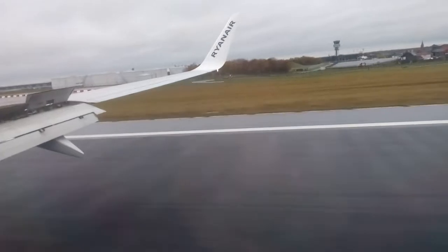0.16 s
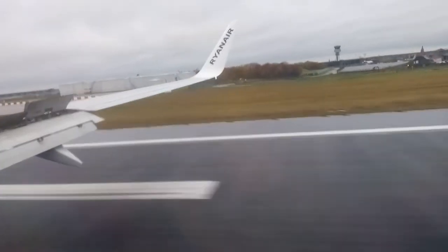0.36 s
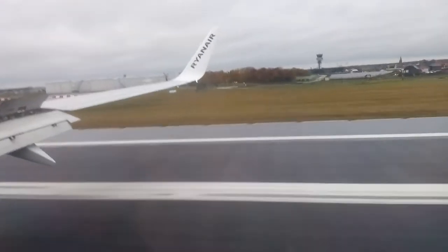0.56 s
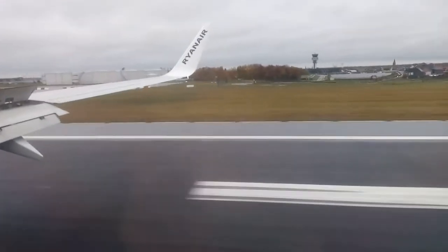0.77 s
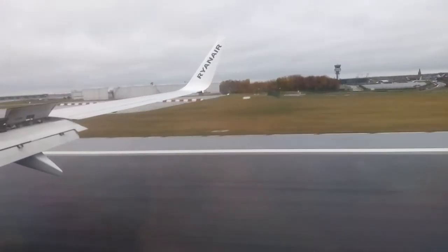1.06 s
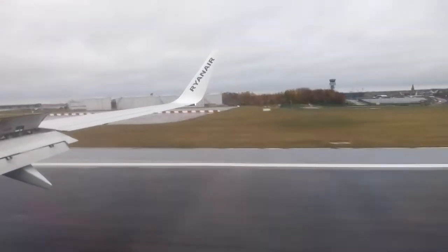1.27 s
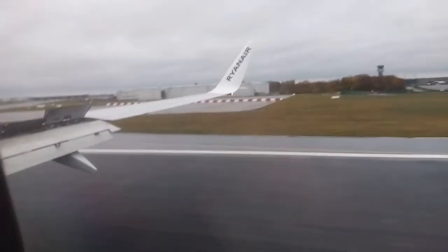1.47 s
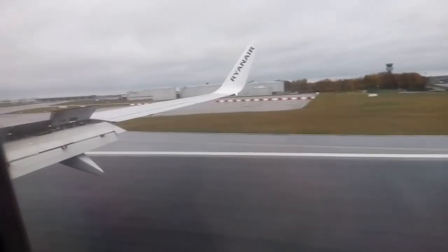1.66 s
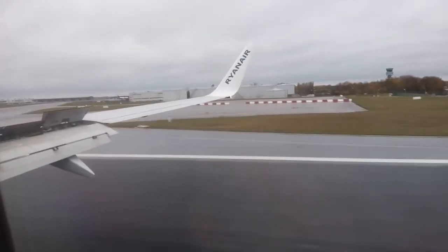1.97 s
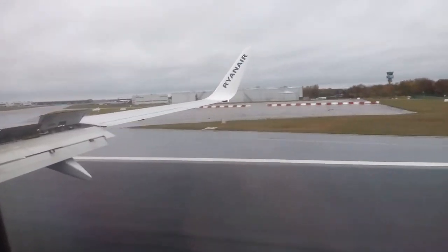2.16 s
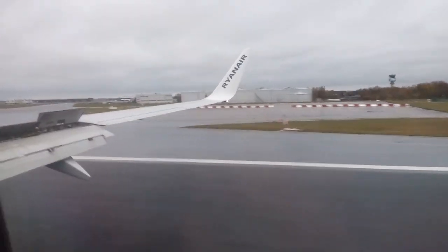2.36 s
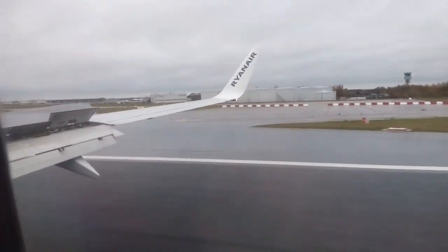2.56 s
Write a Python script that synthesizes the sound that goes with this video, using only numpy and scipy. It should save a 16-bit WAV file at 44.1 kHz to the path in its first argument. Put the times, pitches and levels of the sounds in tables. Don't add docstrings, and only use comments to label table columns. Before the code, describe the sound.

Jet cabin rumble fills the whole take as the plane rolls on wet tarmac, hissing faintly; a burst of rustles, knocks and clinks at the start, sparse ticks later, another rattle near the end, dull close handheld sound.

```python
import sys
import numpy as np
from scipy import signal
from scipy.fft import rfft, irfft
from scipy.io import wavfile
from scipy.ndimage import uniform_filter1d

SR = 44100
rng = np.random.default_rng(int(sys.argv[2]) if len(sys.argv) > 2 else 0)


def to_linear_factor(level_db):
    exponent = np.asarray(level_db, float) / 20
    return 10 ** exponent


def waveform_to_disk(signal):
    frames = np.transpose(np.atleast_2d(signal))
    scaled = np.clip(frames, -1, 1) * 32767
    samples = np.round(scaled).astype(np.int16)
    wavfile.write(sys.argv[1], SR, samples)


N = 119070
T = np.arange(N) / SR


def in_time(rows):
    s, *columns = np.transpose(rows)
    return [np.interp(T, s, column) for column in columns]


def rms_one(x):
    return x / np.sqrt(np.mean(x ** 2) + 1e-20)


def gain_at(points):
    hz, db = np.transpose(points)
    grid_hz = np.maximum(np.arange(N // 2 + 1) * SR / N, 1)
    return to_linear_factor(np.interp(np.log(grid_hz), np.log(hz), db))


def colour(x, points):
    floor = (points[0][0] / 2, -150)
    return rms_one(irfft(rfft(x) * gain_at([floor] + list(points)), N))


def drift(rate_hz):
    lowpass = [(.3, 0), (rate_hz, 0), (4 * rate_hz, -24), (40 * rate_hz, -120)]
    return colour(rng.standard_normal(N), lowpass)


def spread(mid, side):
    return np.array([mid + side, mid - side])


def panned(x, db):
    return x * to_linear_factor(np.array([[db / 2], [-db / 2]]))


def ring(drive, hz, t60):
    radius = to_linear_factor(-60 / (t60 * SR))
    w = 2 * np.pi * hz / SR
    return signal.lfilter([0, np.sin(w)], [1, -2 * radius * np.cos(w), radius * radius], drive + 1e-18)


def click(s, db):
    return to_linear_factor(db) * (np.arange(N) == int(s * SR))


def struck(s, db, hz, t60):
    size = int(7 * SR / hz) + 4
    soft = np.hanning(size)
    touch = soft * np.cos(2 * np.pi * hz / SR * np.arange(size)) * 2 / soft.sum()
    return ring(np.convolve(click(s, db), touch)[:N], hz, t60)


def boom(level_db):
    # f/Hz, density/dB per Hz
    common = [(12, -49), (20, -42.5), (38, -15), (87, -7), (225, 0), (345, -9), (375, -13), (441, -17),
              (1000, -37.5), (1300, -58), (2200, -120)]
    # f/Hz, density/dB per Hz
    difference = [(12, -48), (20, -26.5), (38, -30), (89, -12), (168, -5.5), (298, -7.5), (1000, -17.5),
                  (1300, -49.5), (2200, -120)]
    difference_db = -19
    mid, side = rng.standard_normal((2, N))
    return to_linear_factor(level_db) * spread(colour(mid, common), to_linear_factor(difference_db) * colour(side, difference))


def panels():
    # f/Hz, bandwidth/Hz, common level/dB, difference level/dB, growth/dB per s
    modes = [
        (87.8, 33.5, -26, -45, -4),
        (437.3, 36, -37, -47, -1),
        (231, 64, -20, -42, 0),
        (345.8, 35, -27, -44.5, -.5),
        (802, 27, -55, -51, 2.5),
        (1406, 93, -55.5, -52, 5),
        (2243, 140, -59, -64, 3.5),
        (2060, 130, -55.5, -66, 1),
        (2810, 78, -64.5, -66.5, 4),
        (2500, 90, -65.5, -64.5, 7.5),
    ]
    out = 0
    for hz, width, db, wide_db, growth_db in modes:
        t60 = np.log(1000) / (np.pi * width)
        mid, side = (rms_one(ring(ring(v, hz, t60), hz, t60)) for v in rng.standard_normal((2, N)))
        wander_db = 4.5 if hz > 1000 else 3
        level_db = wander_db * drift(11.0) + growth_db * (T - N / 2 / SR)
        out = out + to_linear_factor(level_db) * spread(to_linear_factor(db) * mid, to_linear_factor(wide_db) * side)
    return out


def air(change_db):
    # f/Hz, density/dB per Hz
    common = [(470, -18), (800, -4), (1010, -9.5), (1410, -10.5), (1770, -15.5), (2210, -15.5), (2990, -22),
              (5960, -30.5)]
    # f/Hz, density/dB per Hz
    difference = [(470, -38.5), (800, -9.5), (1170, -15.5), (1420, -9), (1700, -17.5), (2230, -20.5),
                  (2700, -23), (5910, -33.5)]
    common_db, difference_db = -40, -39.5
    lean = 0.44
    gust_db, gusts_hz = .7, 9.0
    mid, side = rng.standard_normal((2, N))
    side = lean * mid + np.sqrt(1 - lean ** 2) * side
    gust = to_linear_factor(change_db + gust_db * drift(gusts_hz))
    return gust * spread(to_linear_factor(common_db) * colour(mid, common), to_linear_factor(difference_db) * colour(side, difference))


def shuffles():
    # t/s, length/s, level/dB, left-right/dB
    slides = [(0.017, 0.033, -40.5, -2.5), (0.118, 0.064, -31, 2.5), (0.184, 0.075, -41.5, 5.5),
              (0.275, 0.14, -39, 3), (0.370, 0.024, -31, 2), (0.405, 0.053, -51.5, -5),
              (0.424, 0.02, -30.5, 3), (0.437, 0.037, -34.5, 3.5), (0.591, 0.045, -43, 1),
              (0.07, 0.027, -45.5, 4), (0.49, 0.008, -28, 1), (0.505, 0.018, -38, -5),
              (0.695, 0.17, -46, 11), (2.317, 0.037, -46.5, 14.5), (2.328, 0.027, -38.5, 1.5),
              (2.423, .08, -53.5, 2), (2.56, 0.027, -42, 10.5)]
    # f/Hz, density/dB per Hz
    rubbing = [(700, -27), (1200, -12.5), (2000, 0.5), (2800, -0.5), (4800, -3), (6000, -2), (9500, 0.5),
               (15000, -9.5)]
    attack_s, grain_db, grain_hz = .003, 1.5, 100.0
    alike = 0.45
    mid, side = (colour(v, rubbing) for v in rng.standard_normal((2, N)))
    rub = spread(np.sqrt(1 + alike) * mid, np.sqrt(1 - alike) * side) / np.sqrt(2)
    grain = to_linear_factor(grain_db * drift(grain_hz)) * rub
    shape = 0
    for s, length, db, pan_db in slides:
        age = np.maximum(T - s, 0)
        envelope = np.minimum(age / attack_s, 1) * np.exp(-(age / length) ** 2)
        shape = shape + panned(to_linear_factor(db) * envelope, pan_db)
    return shape * grain


def knocks():
    # t/s, decay time/s, level/dB, left-right/dB
    blows = [(0.128, 0.011, -37, 4.5), (0.432, 0.009, -37, -7.5), (0.445, 0.0086, -32, 4),
             (2.588, 0.006, -40.5, -2.5), (2.429, .006, -34.5, -2), (0.4957, 0.0032, -18, 6.5),
             (0.514, 0.0096, -32, -1), (1.108, .004, -37, 0), (1.36, 0.0092, -30, 10),
             (1.880, 0.0094, -38.5, 3), (2.329, 0.0067, -29, 2), (2.339, 0.008, -29, 3),
             (2.351, .015, -31.5, 4.5), (2.368, .012, -38, 0)]
    # f/Hz, density/dB per Hz
    hollow = [(500, -15.5), (1000, 5.5), (1600, 5), (2300, -2), (3500, -3.5), (4500, -14), (8000, -14.5),
              (15000, -17)]
    attack_s, crosstalk = 0.00032, 0.15
    body = np.array([colour(v, hollow) for v in rng.standard_normal((2, N))])
    shape = 0
    for s, die, db, pan_db in blows:
        envelope = np.exp(-np.maximum(T - s, 0) / die) * np.clip((T - s) / attack_s, 0, 1)
        shape = shape + panned(to_linear_factor(db) * envelope, pan_db)
    return shape * (body + crosstalk * body[::-1])


def clinks():
    # t/s, level/dB, f/Hz, t60/s, left-right/dB
    contacts = [(0.129, -27, 12100, .03, 0), (0.200, -42, 5950, .07, 3), (0.267, -24, 12100, .015, 0),
                (0.4935, -29, 6100, .04, 1), (0.444, -38, 5900, .02, 2), (0.448, -28, 11900, .02, 1),
                (0.513, -27, 11300, .025, 1), (0.506, -31, 10400, .04, 1), (0.4950, -34, 4310, .04, 1),
                (0.4935, -19, 10600, .01, 1), (0.510, -37, 6110, .03, 1), (0.521, -46, 6110, .05, 1),
                (1.027, -35, 12100, .015, 0), (1.287, -31, 12100, .015, 0), (1.392, -38, 11900, .05, 0),
                (1.668, -39, 12100, .03, 0), (2.545, -37, 1180, .12, 0), (2.550, -42, 2210, .1, 0),
                (1.640, -41, 2230, .12, 0), (1.875, -42, 2200, .08, 0), (1.360, -32, 2200, .05, 14),
                (1.361, -33, 1150, .03, 2), (2.336, -29, 640, .09, 0), (2.338, -35, 7060, .04, 1),
                (2.340, -33, 860, .06, 0), (2.324, -34, 10500, .06, 2), (2.326, -33, 11700, .07, 2),
                (2.350, -41, 9200, .08, 2), (2.343, -34, 2140, .04, 2), (2.345, -40, 3360, .05, 4),
                (2.350, -38, 7000, .04, 1), (2.363, -41, 7120, .05, 1), (2.372, -42, 7060, .02, 1),
                (2.380, -44, 7060, .03, 1)]
    out = 0
    for s, db, hz, t60, pan_db in contacts:
        out = out + panned(struck(s, db, hz, t60), pan_db)
    return to_linear_factor(2) * out


def ticks():
    # t/s, peak level/dB, f/Hz, left-right/dB
    snaps = [(0.9093, -43, 5170, 20), (1.082, -40, 6200, 8.5), (1.1092, -30.5, 6600, 17.5),
             (1.514, -50, 7000, 7), (1.303, -38.5, 6280, 5), (1.3845, -36.5, 6140, 9),
             (1.393, -31.5, 6260, 7.5), (1.4723, -37.5, 6440, 15), (1.721, -43.5, 6600, 7),
             (1.862, -42.5, 6530, 2.5), (2.28, -34, 5660, 14), (2.333, -41.5, 5500, -1.5),
             (2.428, -45.5, 3540, 0), (2.484, -41, 6890, 6.5), (2.5677, -29.5, 6310, 11)]
    ring_cycles, crack_db, crack_s = 24, 10.5, 0.0011
    hiss = colour(rng.standard_normal(N), [(2500, -12), (5500, -7), (9000, 1.0), (15000, 1.5)])
    out = 0
    for s, db, hz, pan_db in snaps:
        decay = np.exp(-np.maximum(T - s, 0) / crack_s) * (T >= s)
        crack = to_linear_factor(db + crack_db) * hiss * decay
        out = out + panned(struck(s, db, hz, ring_cycles / hz) + crack, pan_db)
    return out


def scene():
    # t/s, rumble level/dB, air and spray change/dB
    roll = [
        (0, -10, 5.5),
        (.1, -10, 4),
        (.36, -10, 1.5),
        (.6, -9.5, 0),
        (1.0, -9.5, 1.5),
        (1.4, -9, 1.5),
        (1.9, -9.5, 1),
        (2.2, -10, 1),
        (2.45, -12, 3),
        (2.7, -11, -1),
    ]
    level_db, change_db = in_time(roll)
    roar = boom(level_db - 2.5) + to_linear_factor(level_db - level_db.mean()) * panels()
    steady = panned(roar, .9) + air(change_db)
    return steady + shuffles() + knocks() + clinks() + ticks()


def band_limit(x):
    return signal.sosfilt(signal.butter(12, 15460, fs=SR, output="sos"), x)


def record(dry):
    # f/Hz, gain/dB
    rolloff = [(6300, 0), (7300, -11.5), (7900, -20), (9500, -22), (10200, -30), (12000, -29), (15500, -51)]
    knee_db, share, hold_s = -8.5, 0.33, 0.0017
    size = int(hold_s * SR) + 1
    power = uniform_filter1d(uniform_filter1d(np.mean(dry ** 2, axis=0), size), size)
    over_db = np.maximum(10 * np.log10(power + 1e-9) - knee_db, 0)
    gain = uniform_filter1d(uniform_filter1d(to_linear_factor(-share * over_db), 2 * size), 2 * size)
    taps = np.roll(irfft(gain_at(rolloff), N), 64)[:129] * np.hanning(129)
    held = np.pad(dry * gain, ((0, 0), (64, 64)), "reflect", reflect_type="odd")
    return band_limit(signal.fftconvolve(held, taps[None], "valid", axes=1))


dry = scene()
out = record(dry)
waveform_to_disk(out)
```